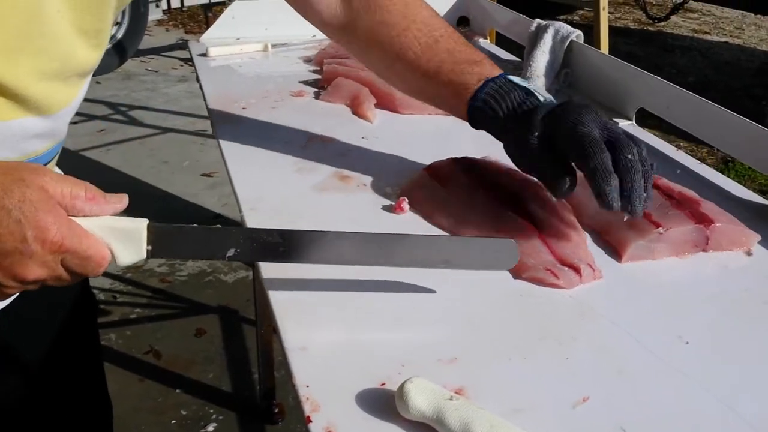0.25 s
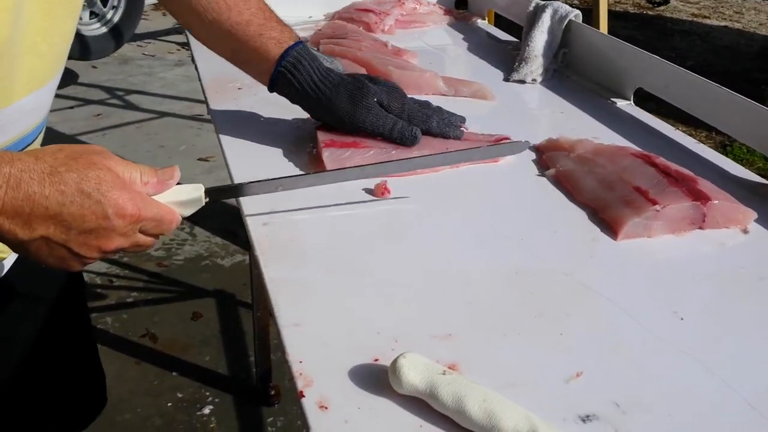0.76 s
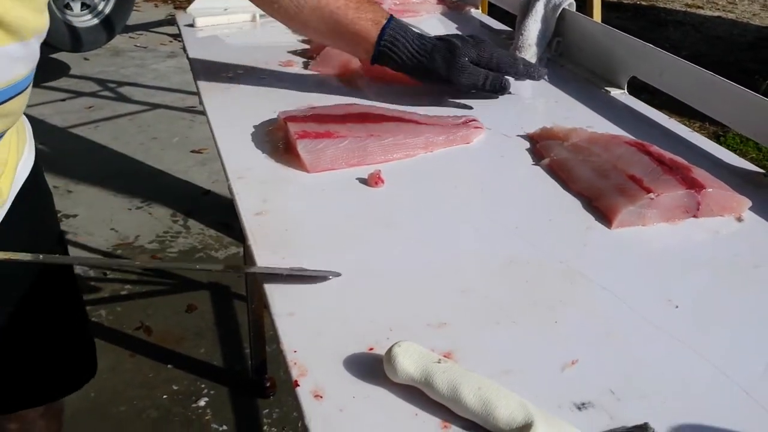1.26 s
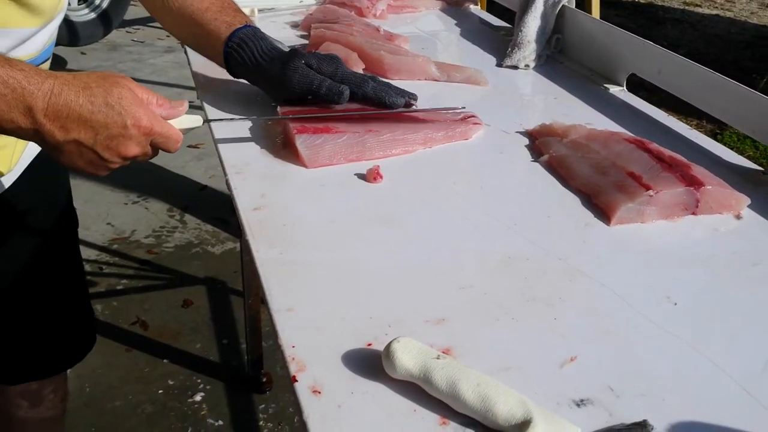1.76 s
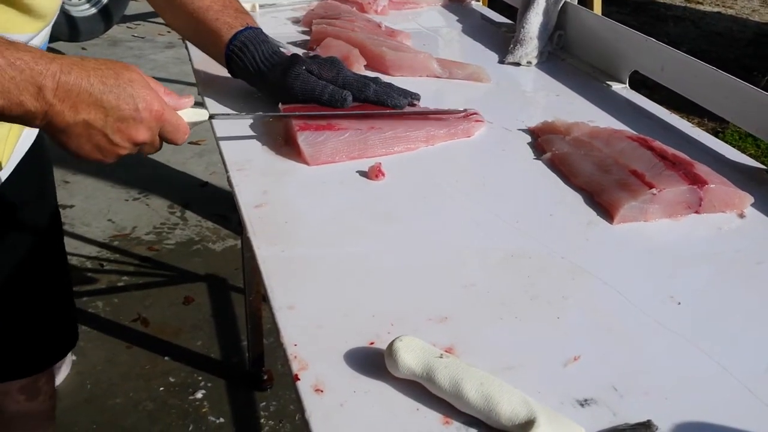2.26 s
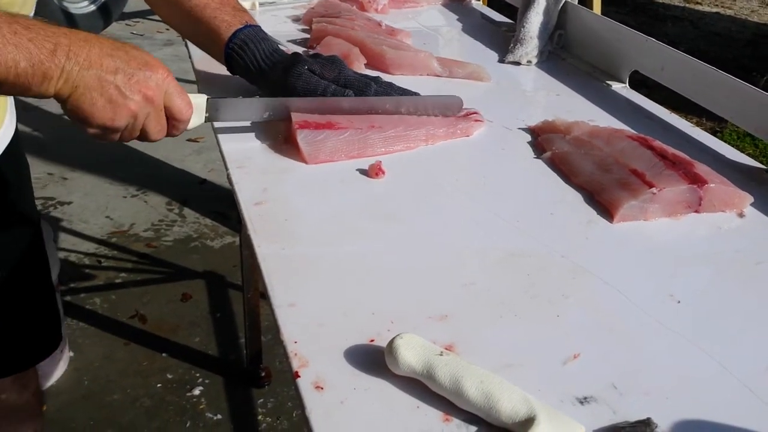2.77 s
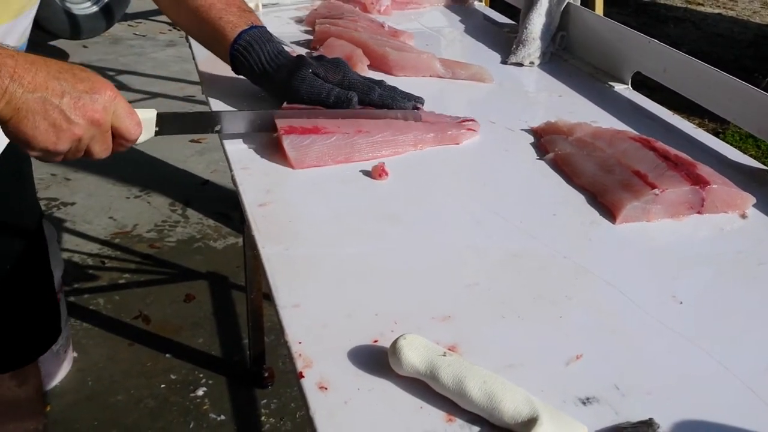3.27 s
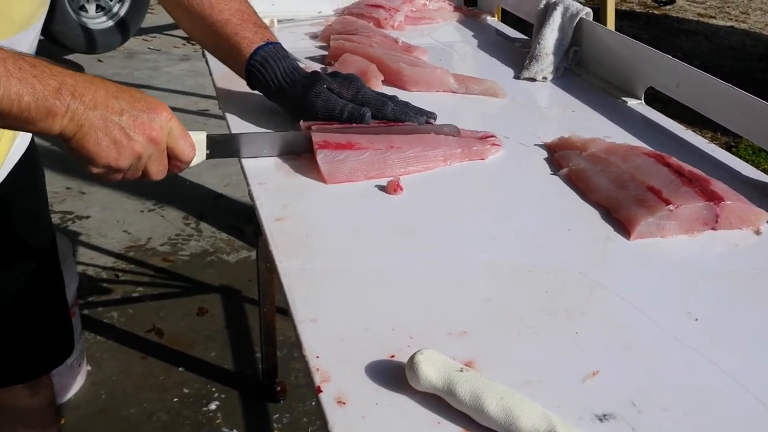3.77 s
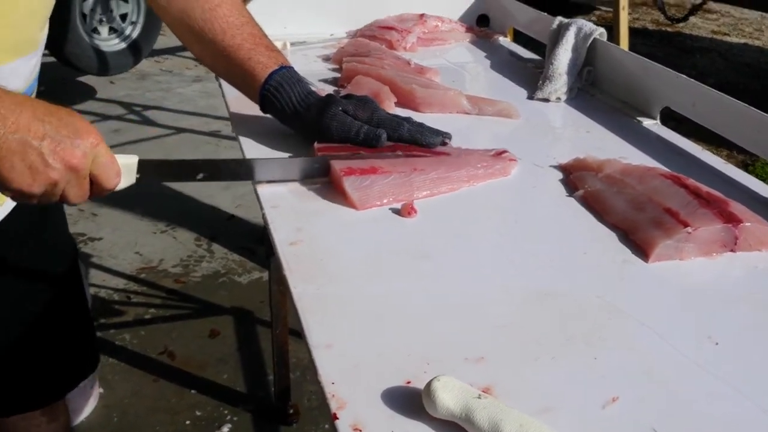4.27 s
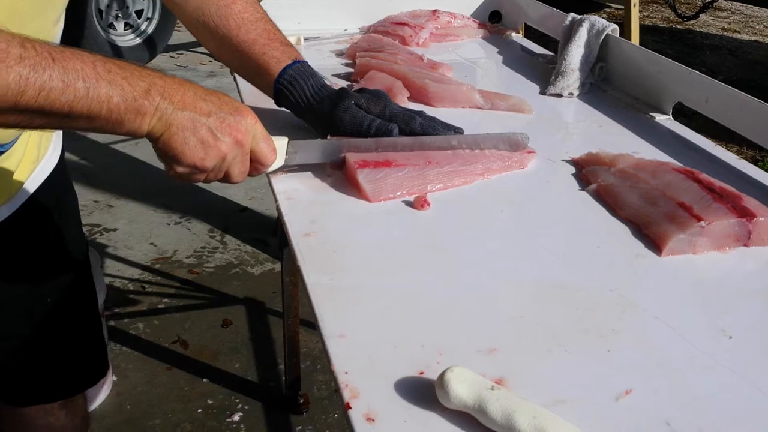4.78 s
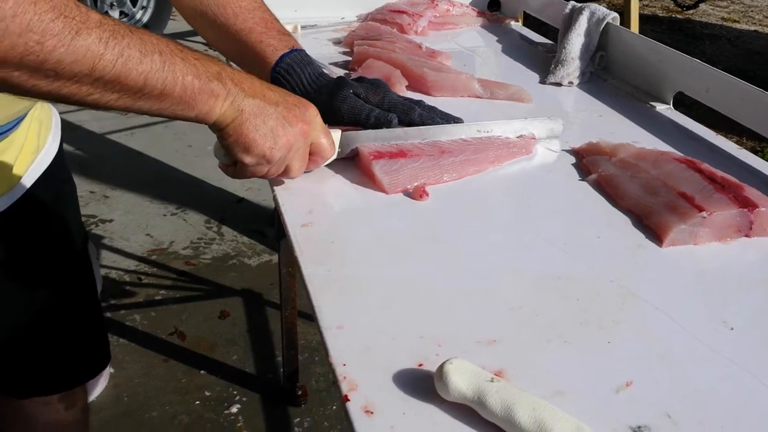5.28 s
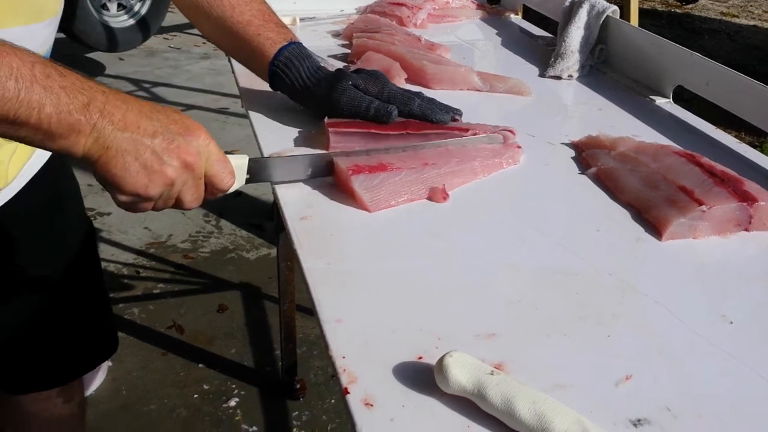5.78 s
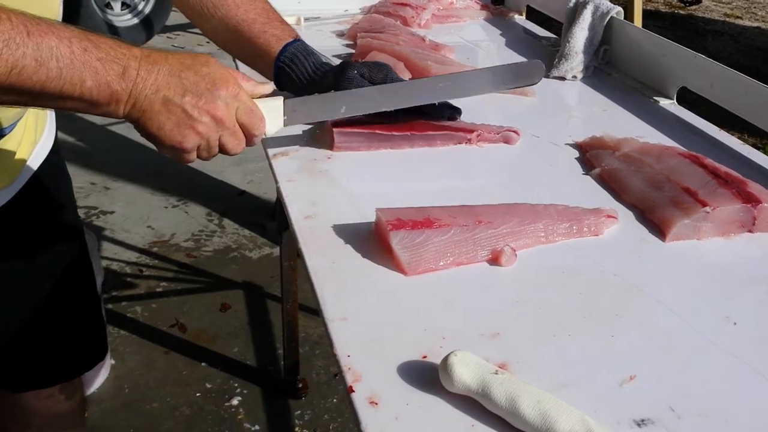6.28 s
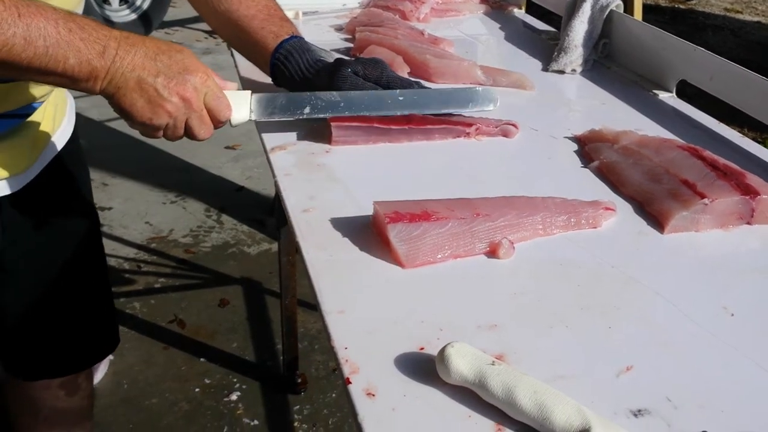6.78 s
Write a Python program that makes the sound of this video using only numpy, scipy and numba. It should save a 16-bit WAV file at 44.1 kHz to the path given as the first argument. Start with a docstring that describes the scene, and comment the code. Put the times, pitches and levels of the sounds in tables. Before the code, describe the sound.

Close by in the open air, an electric knife runs with a harsh, steady, high whine and fizzy rattle. It is switched off, its pitch sliding down through a rough chatter to a stop. Tiny taps and a low faraway engine remain for about a second. Then it kicks on, sweeps up, overshoots slightly and settles back to its whine. Stereo microphone at arm's length.

```python
"""An electric fillet knife whirs outdoors, an arm's length from a stereo microphone. A motor pinion of 11 teeth
drives a gear of 50 that strokes the blades; mesh tones and rattle noise ring the plastic handle.
It coasts to rest, then starts again, racing before it settles. Small knocks (noise bursts), scrapes (swelling
noise) and short gliding tones come mostly from the wet table, a few from the slowing or starting knife.
A distant engine drones as low tones over road rumble, and the outdoor hush is softly flickering noise."""
import sys
import numpy as np
from scipy import signal
from scipy.fft import rfft, irfft, next_fast_len
from scipy.io import wavfile
from scipy.ndimage import uniform_filter1d
from numba import njit

SR = 44100
rng = np.random.default_rng(int(sys.argv[2]) if len(sys.argv) > 2 else 0)


def write(x):
    x = np.atleast_2d(x).T
    wavfile.write(sys.argv[1], SR, np.round(np.clip(x, -1, 1) * 32767).astype(np.int16))


N = 310464
TIME = np.arange(N) / SR  # seconds
STEP = 64  # samples between the values of slowly changing controls
PINION_TEETH, GEAR_TEETH = 11, 50
ON_S = 3.591  # the knife is switched on again


def knife():
    """All layers follow gear speed and blade load; uneven turns blur the tones and favour the low rattle."""
    # load on the blades, one list for each run: start_s, rattle_db, tooth_pressure_db (all tones),
    # mesh_tone_db, mesh_octave_db, left_minus_right_db; the levels are changes
    blade_load = [
        [(0, -2, 0.5, -2, 8.5, 0), (.17, -0.5, 3, -3, -0.5, -3.5), (.45, 0, 2, 2.5, -1.5, -2.5),
         (.85, -1.5, 3, -1, -3, -2), (1.08, 0.5, 0, -5.5, 6, -3.5), (1.3, -0.5, -0.5, -1.5, 4.5, -3),
         (1.6, -0.5, 0, 1.5, 5.5, -2), (1.74, -0.5, 3.5, -6, -0.5, -2), (1.79, 2, 2.5, 2, 7, -1.5),
         (1.89, 2, 2.5, 2, 3, -1.5), (2.02, 2.5, 1, -2, -6, -0.5), (2.07, -1, 1, -7, -7, 1),
         (2.13, -1.5, 3, -2, -4, 2), (2.36, 7, -5.5, -3, 8, -3.5), (2.52, 0.5, 0.5, -3, -1, 1.5),
         (2.6, 9, -18.5, -6, -7, 4)],
        [(3.6, 8.5, -20, 0, 2, 0), (3.64, 10, -19, 0, 0, 1), (3.7, -8.5, -14, 0, 0, 0),
         (3.77, -2, -12, 4, -3, -1), (3.86, 1, -4.5, 12, -6, -2.5), (3.9, 0.5, -4, 2, 3, 1),
         (4.06, 2, -5, -2, 3.5, -1), (4.11, 0.5, -1.5, 3.5, 7.5, -0.5), (4.22, 1.5, 1, 6, 7.5, -0.5),
         (4.5, 1, 3.5, -5, 3, 0.5), (4.65, 0, 7.5, -1.5, -2.5, -0.5), (4.88, 1, 6, -12.5, -5, 0),
         (5.04, -0.5, 3.5, 1, -1.5, -1.5), (5.3, -1.5, -1.5, -2.5, 7, -0.5), (5.4, 0, 1, -0.5, -0.5, -1),
         (5.7, 0.5, 1, -1, -1.5, -1.5), (6.05, -2.5, 4, -1.5, 0.5, -1.5), (6.5, -2, 3, -5, 2.5, -1.5),
         (7.04, -0.5, 2, -2, 1, -1)],
    ]
    turn_hz, cruise_hz = speed()
    turns = np.cumsum(turn_hz) / SR
    s, *columns = np.transpose(blade_load[0] + blade_load[1])
    load_db, pressure_db, mesh_db, octave_db, pan_db = (np.interp(TIME, s, c) for c in columns)
    share = turn_hz / cruise_hz

    # the blades die away, and catch again
    rest_s, stop_s, catch_s = 2.56, .2, .03
    moving = np.clip(np.maximum((rest_s - TIME) / stop_s, (TIME - ON_S) / catch_s) + 1, 0, 1)

    # off cruising speed, turns stop repeating: steady falls from 1
    unrest_s, unrest_limit_hz, least_steady = .12, 2.8, .12
    keep = np.exp(-1 / (unrest_s * SR))
    unrest_hz = signal.lfilter([1 - keep], [1, -keep], abs(turn_hz - cruise_hz))
    steady = least_steady + (1 - least_steady) / (1 + (unrest_hz / unrest_limit_hz) ** 3)

    rattle_db = -32 + load_db + 5 * np.log2(share)  # falls 5 dB as the speed halves
    # lows of the rattle gain toward standstill and when turns are uneven
    clatter_db = -.5 + 11.5 * np.clip(1 - share, 0, 0.6) + 3 * (1 - steady)

    # scatter of the gear angle in radians; more below cruising speed
    driven_rad, slack_rad, slack_hz = .008, .009, 36
    slack = np.clip((cruise_hz - turn_hz) / slack_hz, 0, 1)
    scatter = (1 - steady) * (driven_rad + slack_rad * slack) * np.minimum(share, 1) ** .3

    tones = whine(turn_hz[::STEP], turns, steady[::STEP], scatter, mesh_db[::STEP], octave_db[::STEP])
    tones = tones * undb(pressure_db + 0.74 * (rattle_db + 29.0))
    noise = rattle(turns, steady, clatter_db, share) * undb(rattle_db)
    sound = coding_gap((tones + noise) * moving ** 3 + chatter(turns))
    return shake(turn_hz, turns) + sound * undb(np.array([pan_db, -pan_db]) / 2)


def speed():
    """Gear turns per second: friction, viscous and dry, slows it when off; switched on, it races and settles."""
    # speed at which the gear settles while switched on: start_s, turns_per_s
    settled_speed = [(0, 55.4), (.3, 55.29), (.9, 55.32), (1.2, 55.5), (1.5, 55.63), (1.65, 55.63),
                     (1.735, 53.6), (2.6, 53.6), (3.6, 55.25), (5.05, 55.22), (5.4, 55.07), (5.8, 55.2),
                     (7.04, 55.3)]
    cruise_hz = np.interp(TIME, *np.transpose(settled_speed))

    off_s, coast_s, drag_hz, creep_hz = 1.735, .72, 19, 2
    sag_hz, sag_s = 3, .06  # quick first loss as the current dies
    idle = np.maximum(TIME - off_s, 0)
    coast = (cruise_hz - sag_hz + drag_hz) * np.exp(-idle / coast_s) - drag_hz
    coast = coast + sag_hz * np.exp(-idle / sag_s)

    spin_up_s, spin_up_bend = .2272, 1.593
    overshoot_hz, settle_s, settle_bend = 9.69, 1.039, 2.33
    since = np.maximum(TIME - ON_S, 0)
    race = cruise_hz + overshoot_hz * np.exp(-(since / settle_s) ** settle_bend)
    start = race * (1 - np.exp(-(since / spin_up_s) ** spin_up_bend))

    turn_hz = np.maximum(np.where(since > 0, start, coast), creep_hz)
    return uniform_filter1d(turn_hz, int(.05 * SR)), cruise_hz  # inertia evens out .05 s


def whine(turn_hz, turns, steady, scatter, mesh_db, octave_db):
    """Tones of gear and motor glide through the handle's resonances; each wavers, differently at each port.
    When turns stop repeating, the side tones melt into a rough mesh tone."""
    # tones that repeat with each gear turn: multiple of the gear turn rate
    gear_multiples = [4, 5, 6, 7, 9, 13, 16, 17, 24, 30, 34, 40, 42, 46, 49, 50, 58, 85, 90, 91, 93, 94, 95,
                      96, 97, 98, 99, 100, 101, 102, 103, 104, 105, 106, 107, 108, 118, 130, 144, 150, 151,
                      200, 250]
    # their levels at cruising speed, before load and waver: level_db
    gear_db = [-51, -39, -39, -52, -47, -53, -47, -52, -53, -50, -48, -47, -52, -51, -49, -26, -48, -47,
               -40, -42, -44, -33, -41, -33, -30, -32, -24, -17, -27, -36, -34, -39, -36, -39, -37, -36,
               -47, -49, -49, -37, -50, -46, -58]
    # tones that repeat with each motor turn: multiple of the motor turn rate
    motor_multiples = [1, 14, 20, 21, 23, 25, 28, 32, 36, 42, 56]
    # their levels at cruising speed, before load and waver: level_db
    motor_db = [-50, -49, -42, -35, -33, -46, -39, -50, -51, -52, -61]
    # as the knife turns, the mesh tone leans: start_s, left_minus_right_db
    mesh_pan = [(0, -3), (.4, 1), (.9, 1.5), (1.2, 5.5), (1.5, 7), (1.7, 2), (3.8, 2), (5.2, 2),
                (5.5, -3.5), (5.75, -3.5), (6.0, 0), (6.3, 2.5), (7.04, 1.5)]
    cruise_hz = 55.3  # gear turns per second

    multiples = np.r_[gear_multiples, np.array(motor_multiples) * GEAR_TEETH / PINION_TEETH]
    shared, drift = walk(5., count=len(multiples)), walk(11.0, count=len(multiples))
    own, slip = (walk(3., count=2 * len(multiples)).reshape(-1, 2, len(steady)) for _ in range(2))
    rough = scatter * band(rng.standard_normal(N), 92.0, 190.0)
    # teeth lose contact now and then, more when turns are uneven
    breaks_db = -3.2 * (1.12 - steady) * np.maximum(walk(45, count=3), 0) ** 1.5
    # uneven turns chop the mesh tones into short bursts, mostly once a turn
    flutter_db = 2.8 * (1 - steady) * (np.minimum(walk(130, count=5), 1.3) - .3)
    throb_db = 5 * (1 - steady) * (np.cos(2 * np.pi * turns[::STEP]) - .3)
    lean_db = np.interp(TIME[::STEP], *np.transpose(mesh_pan)) * np.array([[.5], [-.5]])

    out = np.zeros((2, N))
    for k, (m, db) in enumerate(zip(multiples, np.r_[gear_db, motor_db])):
        is_mesh = m % GEAR_TEETH == 0
        order = int(m // GEAR_TEETH)
        # slow teeth knock one by one, so high overtones gain
        sharp = np.minimum(turn_hz / cruise_hz, 1) ** (-.45 * max(m / GEAR_TEETH - 2, 0))
        ring = sharp * (handle(m * turn_hz + 1) / handle(m * cruise_hz)) ** 0.63
        if not is_mesh:
            ring = ring * steady ** 2
        tone_db = db + mesh_db * (m == GEAR_TEETH) + octave_db * (m == 2 * GEAR_TEETH)
        waver_db = (.5 if m == GEAR_TEETH else 1.4) * shared[k] + 1.2 * own[k]
        gain = np.sqrt(2) * ring * undb(tone_db + waver_db)
        if m == GEAR_TEETH:
            gain = gain * undb(lean_db - .8 * own[k])  # its ports waver less apart
        if is_mesh:
            loss_db = breaks_db[order % 3] / (1 + .3 * (m == 2 * GEAR_TEETH))
            gain = gain * undb(flutter_db[order - 1] + throb_db * (m > GEAR_TEETH) + loss_db)
        # neighbours of a mesh tone start in step, so the teeth press hardest once a turn
        start = rng.uniform(0, 2 * np.pi) * (abs((m + 25) % GEAR_TEETH - 25) > 1)
        phase = start + 0.28 * drift[k] + 0.34 * min(m / 100, 1) ** 2 * slip[k]
        out += sing(turns, m, rough, gain, phase, STEP)
    return out


@njit
def sing(turns, multiple, scatter, gain, phase, step):
    """A tone locked to the turns; gain and phase of each port are given every step samples."""
    out = np.empty((2, len(turns)))
    for side in range(2):
        for i in range(len(turns)):
            k = min(i // step, gain.shape[1] - 2)
            part = i / step - k
            g = gain[side, k] + part * (gain[side, k + 1] - gain[side, k])
            p = phase[side, k] + part * (phase[side, k + 1] - phase[side, k])
            out[side, i] = g * np.sin(2 * np.pi * (multiple * turns[i] % 1) + p + multiple * scatter[i])
    return out


def rattle(turns, steady, clatter_db, share):
    """Blades and gear backlash: dense grit, beaten at the stroke ends, rings the handle; its lows vary alone."""
    beat = 1 + 0.078 * np.cos(2 * np.pi * turns) + 0.04 * np.cos(4 * np.pi * turns + 3.9)
    shared, left, right = rng.standard_normal((3, N)) * undb(2.55 * rng.exponential(size=(3, N))) * beat
    # the gear's own wear returns with every turn
    wear = rng.standard_normal((2, 700))
    worn = np.array([w[(turns % 1 * len(w)).astype(int)] for w in wear]) * steady
    grit = unit(colour(shared + 1.86 * np.array([left, right]) + 1.78 * worn, handle))

    # off cruising speed the teeth hardly ring the brightest resonance
    bright_filter = signal.butter(1, [5350.0, 6200.0], "band", fs=SR, output="sos")
    bright = signal.sosfilt(bright_filter, grit)
    grit = grit - bright * np.clip(.75 * (1 - steady) + .8 * (1 - share), 0, .9)

    lows = colour(grit, lambda hz: 1 / (1 + (hz / 2430.0) ** 6))
    flicker = undb(1.26 * np.array([smooth(w) for w in walk(13.1, count=2)]))
    # slow grit is dull
    treble = colour(grit, lambda hz: 1 / (1 + (8500 / hz) ** 10))
    grit = grit - treble * np.clip(1.4 * (1 - share), 0, .85)
    return undb(12.0) * ((grit - lows) * flicker[0] + lows * flicker[1] * undb(clatter_db))


def chatter(turns):
    """Coasting teeth touch every second time: a rough tone at half the mesh rate."""
    # the spell of chatter: start_s, end_s, level_db (of a sine with peak 1)
    chatter_spell = (1.853, 2.043, -31.5)
    start, end, db = chatter_spell
    uneven = 1 + 0.58 * band(rng.standard_normal(N), 44.0, 35.0)
    return undb(db) * swell(start, end, 0.49) * uneven * np.sin(np.pi * GEAR_TEETH * turns)


def shake(turn_hz, turns):
    """The racing rotor shakes the handle once a motor turn."""
    # the spell of shaking: start_s, end_s, level_db (before swell and resonance)
    shake_spell = (3.73, 4.95, -29)
    start, end, db = shake_spell
    motor_turns = turns * GEAR_TEETH / PINION_TEETH
    ring = smooth(handle(turn_hz[::STEP] * GEAR_TEETH / PINION_TEETH)) / handle(282.7)
    return np.sqrt(2) * undb(db) * swell(start, end, 0.87) * ring * np.sin(2 * np.pi * motor_turns)


def handle(hz):
    """Gain of the plastic handle's resonances, summed in power; skirts fall steeply."""
    # resonances of handle and blades: centre_hz, width_hz, level_db (relative)
    resonances = [(281.9, 8.3, -15.5), (351, 43, -9.5), (478, 81, -10.5), (900, 435, -13.5),
                  (1570, 440, -20.5), (2224, 1000, -11.5), (3520, 990, -10), (5130, 410, -2),
                  (5610, 520, 4), (5713, 450, 3), (7120, 780, -4.5), (8320, 1440, -10.5), (1090, 80, -16),
                  (2320, 84, -20.5), (10650, 1330, -16.5), (13800, 320, -24)]
    return np.sqrt(sum(undb(2 * db) / (1 + (2 * (hz - f) / w) ** 2) ** 1.43 for f, w, db in resonances))


def coding_gap(x):
    """Lossy audio coding leaves a narrow gap near 12 kHz."""
    # the gap: centre_hz, width_hz, level_db
    gap = (12220, 540, -28)
    gap_hz, width_hz, db = gap
    return colour(x, lambda hz: undb(db * np.exp(-((hz - gap_hz) / width_hz) ** 4)))


def small_sounds():
    """Knocks decay at once, scrapes swell unevenly, short tones glide and waver; most come from the table."""
    # start_s, level_db (relative), centre_hz, width_hz, decay_ms, left_minus_right_db
    knocks = [(1.027, -11, 5500, 5030, 7, 6), (1.03, -18, 980, 900, 4.9, 5),
              (2.918, -30.5, 220, 150, 25, -2), (3.115, -40, 7000, 3000, 2.5, 0),
              (3.194, -46, 8500, 5000, 2, -2), (3.457, -44, 10500, 4000, 2.5, -2),
              (3.487, -38, 7500, 3000, 2.5, 0), (3.283, -42, 7500, 2500, 2.5, 0),
              (3.638, -23, 2000, 1200, 6, 0), (3.862, -11, 4100, 1800, 1.8, 4),
              (3.862, -14, 7300, 2500, 1.5, 0), (3.894, -8, 1800, 1600, 2.2, -3),
              (3.894, -6, 7200, 3000, 2.2, -3), (3.894, -18, 10500, 4000, 1.5, -3),
              (3.894, -13, 4000, 1200, 1.8, 0), (4.279, -18, 2000, 2000, 4.9, 4),
              (4.488, -15, 6900, 5000, 7.5, 2), (5.133, -18.5, 640, 500, 10.4, 2)]
    # swelling bands of noise; the one at 3.735 s is the knife as it starts up:
    # start_s, length_s, level_db (before the swell), centre_hz, width_hz, left_minus_right_db
    scrapes = [(1.185, .1, -21, 3950, 1300, -3), (1.2, .025, -35, 1950, 500, 0),
               (1.195, .03, -30, 3300, 500, 0), (1.15, .13, -42, 10000, 6000, 0),
               (2.55, .13, -43, 6500, 6000, 0), (2.75, .15, -49, 6000, 4500, 0),
               (2.04, .13, -38, 800, 120, 0), (3.36, .1, -53, 6000, 4000, 0),
               (3.5, .05, -48, 6000, 5000, 0), (1.8, .23, -26, 4900, 2200, 0),
               (2.0, .035, -30, 3200, 2500, 0), (3.735, .14, -33, 2330, 340, 0),
               (2.88, .12, -44, 6000, 4500, 0), (3.45, .055, -39, 6300, 4500, 0),
               (3.11, .08, -53, 6500, 4000, 0), (5.38, .21, -36, 1700, 1500, 0),
               (5.44, .11, -34, 1550, 450, 0), (5.45, .11, -33, 4600, 900, 0),
               (4.42, .1, -40, 1800, 2000, 0)]
    # squeaks; those at 2.31 s and 2.42 s are falling gear-mesh tones of the coasting knife, through
    # a handle resonance: start_s, length_s, start_hz, end_hz, level_db (before the swell), left_minus_right_db
    glides = [(1.9, .058, 3080, 3170, -26, -7), (1.942, .037, 4680, 4580, -19, 0),
              (1.978, .018, 5500, 4800, -25, 0), (2.005, .022, 4700, 4500, -32, 0),
              (2.42, .07, 520, 490, -38, 0), (2.0, .03, 3500, 2000, -32, -4),
              (4.318, .028, 1550, 1600, -30, 0), (5.39, .05, 750, 800, -37, 0),
              (5.445, .045, 1400, 1750, -34, 0), (5.52, .04, 1600, 1350, -35, 0),
              (5.74, .04, 1750, 1800, -37, 0), (2.31, .065, 580, 440, -30, 0)]
    out = np.zeros((2, N))
    for s, db, hz, width_hz, ms, pan_db in knocks:
        t = np.arange(2000) / SR
        hit = rng.standard_normal(2000) + 6 * (t == 0)  # noise led by a click
        add(out, s, undb(db) / 2 * band(hit, hz, width_hz) * np.exp(-t * 1000 / ms), pan_db)
    for s, length, db, hz, width_hz, pan_db in scrapes:
        n = int(length * SR)
        grit = rng.standard_normal(12000)[:n] * undb(2.2 * rng.exponential(size=12000)[:n])
        add(out, s, undb(db) * band(grit, hz, width_hz) * np.hanning(n) ** 0.55, pan_db)
    for s, length, start_hz, end_hz, db, pan_db in glides:
        n = int(length * SR)
        waver = 1 + .03 * unit(uniform_filter1d(rng.standard_normal(4000), 60))[:n]
        phase = 2 * np.pi * np.cumsum(np.linspace(start_hz, end_hz, n) * waver) / SR
        add(out, s, undb(db) * np.sqrt(2) * np.sin(phase) * np.hanning(n) ** 0.2, pan_db)
    return out


def drone():
    """Uneven low firings of a far engine, a wavering fundamental and its octave, over road rumble."""
    # distant engine: start_s, level_db (relative), firing_hz (before waver), rumble_db (relative)
    engine = [(0, -66, 55, -35.5), (1.2, -61, 55.2, -39.5), (2.0, -56, 54.4, -36.5), (2.5, -45, 54.2, -40),
              (3.5, -42, 53.7, -38.5), (4.4, -46.5, 54, -41.5), (5.6, -56, 55.2, -43),
              (7.04, -68, 55, -44.5)]
    s, *columns = np.transpose(engine)
    db, hz, rumble_db = (np.interp(TIME, s, c) for c in columns)
    pitch, *waver = walk(8.3, count=3)
    phase = 2 * np.pi * np.cumsum(hz * (1 + 0.051 * smooth(pitch))) / SR
    firing = 0
    for multiple, tone_db, w in zip([1, 2], [1.5, -10], waver):
        firing = firing + undb(db + tone_db + 3.4 * smooth(w)) * np.sin(multiple * phase)
    mid, side = (band(rng.standard_normal(N), 82.0, 25.0)
                 + 0.96 * band(rng.standard_normal(N), 120.0, 110.0) for _ in range(2))
    rumble = undb(rumble_db - 7.0) * (mid + 0.16 * side * np.array([[1], [-1]]))
    return (firing + rumble) * undb([[.7], [-.7]])


def air():
    """Outdoor hush in octave bands that flicker alone; the bass is alike at both ports, the treble less so."""
    # spectrum of the hush: pitch_hz, level_db (relative)
    hush_spectrum = [(88, -44), (150, -4.5), (229, 2.5), (556, -16.5), (757, -7), (1270, -16.5),
                     (2600, -22), (2860, -26.5), (4290, -20), (7350, -18.5), (13900, -40), (15000, -71)]
    mid, side = rng.standard_normal((2, N))
    hush = colour(mid, lambda hz: undb(on_log(hush_spectrum, hz)))
    apart = colour(side, lambda hz: undb(on_log(hush_spectrum, hz)) * np.clip(hz / 1340.0, .12, 1))
    pair = np.array([hush + apart, hush - apart]) / np.sqrt(np.mean(hush ** 2))
    out = 0
    for octave, flicker in zip(range(7, 15), walk(8., count=8)):  # centres 128 Hz to 16384 Hz
        part = colour(pair, lambda hz: np.cos(np.pi / 2 * np.clip(np.log2(hz) - octave, -1, 1)) ** 2)
        out = out + part * undb(1.5 * smooth(flicker))
    return out * undb(-44)


def undb(db):
    """Turn decibels into a factor."""
    return 10 ** (np.asarray(db) / 20)


def unit(x):
    """Scale a sound to an rms of 1."""
    return x / np.sqrt(np.mean(x ** 2))


def walk(rate, count):
    """Rows of slow chance, one value every STEP samples, spread 1; a higher rate per second moves faster."""
    k = max(int(SR / STEP / rate), 2)
    rows = rng.standard_normal((count, -(-N // STEP) + 2 * k))
    rows = uniform_filter1d(uniform_filter1d(rows, k, axis=1), k, axis=1)[:, k:-k]
    return rows / rows.std(axis=1, keepdims=True)


def smooth(coarse):
    """Values every STEP samples joined by straight lines."""
    return np.interp(np.arange(N) / STEP, np.arange(len(coarse)), coarse)


def swell(start, end, power):
    """A rise and fall between two times in seconds."""
    return np.sin(np.pi * np.clip((TIME - start) / (end - start), 0, 1)) ** power


def colour(x, gain):
    """Weight the spectrum by a function of Hz."""
    size = next_fast_len(N + 4096)
    hz = np.arange(size // 2 + 1) * SR / size + 1  # 1 Hz up, to avoid zero
    return irfft(rfft(x, size) * gain(hz), size)[..., :N]


def on_log(points, hz):
    """Read a curve of (Hz, value) points along a logarithmic pitch axis."""
    return np.interp(np.log(hz), np.log(np.transpose(points)[0]), np.transpose(points)[1])


def band(x, hz, width_hz):
    """Keep one band of a sound, at an rms of 1."""
    edges = [max(hz - width_hz / 2, hz / 4), min(hz + width_hz / 2, .45 * SR)]
    return unit(signal.sosfilt(signal.butter(2, edges, "band", fs=SR, output="sos"), x))


def add(out, s, x, pan_db):
    """Place a sound at s seconds, leaning left when pan_db is positive."""
    i = int(s * SR)
    out[:, i:i + len(x)] += x * undb([[pan_db / 2], [-pan_db / 2]])


def heard(x, lead):
    """Sound at the two ports: their level difference depends on pitch, and the left one leads."""
    # left-minus-right level by pitch; lossy coding thins the left's top: pitch_hz, left_minus_right_db
    side_levels = [(100, 11), (400, 1), (1000, 0), (2400, -2.5), (5000, 6.5), (8000, 0), (12000, -6),
                   (15000, -14)]
    # lead of the left port, before scaling by lead: pitch_hz, lead_rad
    port_phase = [(0, 0), (280, .35), (900, 1), (1900, 1.6), (2760, 2.5), (4800, 4.4), (5530, 6.7),
                  (6550, 9.1), (8290, 14.8), (11050, 21), (15000, 27)]
    sides = np.array([[.5], [-.5]])

    def side_gain(hz):
        turn = lead * sides * np.interp(hz, *np.transpose(port_phase))
        return undb(sides * on_log(side_levels, hz)) * np.exp(1j * turn)
    return colour(x, side_gain)


def scene():
    """Knife on the left, small sounds more ahead (so a smaller lead at the left port), hush and far engine."""
    return heard(knife(), 0.98) + heard(small_sounds(), 0.27) + air() + drone()


def record(dry):
    """The microphone drops the deepest bass; the recorder rounds peaks and cuts the top."""
    dry = signal.sosfilt(signal.butter(2, 40, "high", fs=SR, output="sos"), dry)
    dry = dry / (1 + dry ** 6) ** (1 / 6)
    return signal.sosfilt(signal.ellip(8, .2, 70, 14500, fs=SR, output="sos"), dry)


dry = scene()
out = record(dry)
write(out)
```